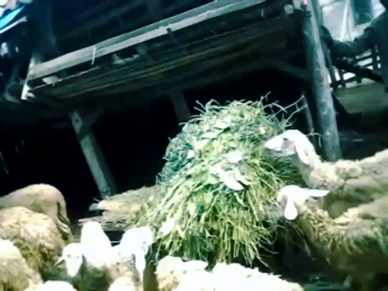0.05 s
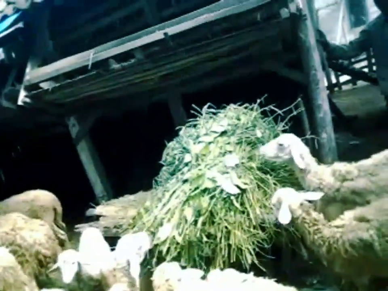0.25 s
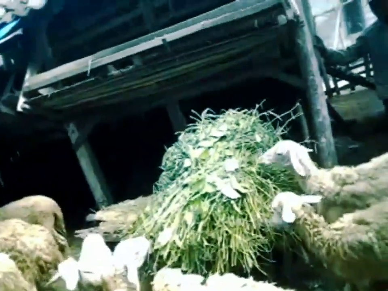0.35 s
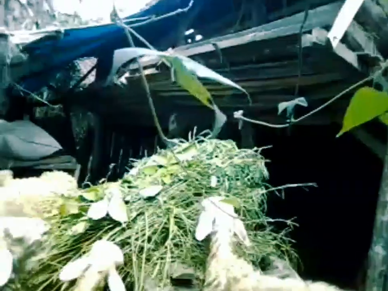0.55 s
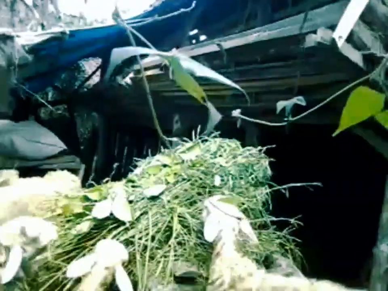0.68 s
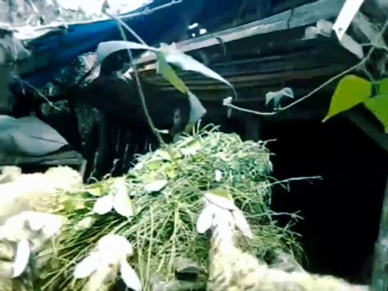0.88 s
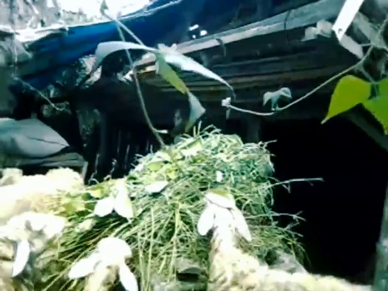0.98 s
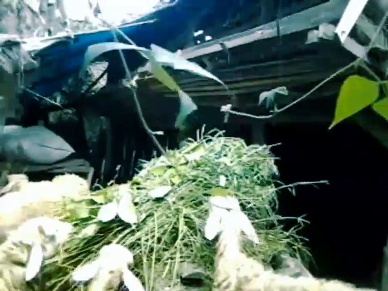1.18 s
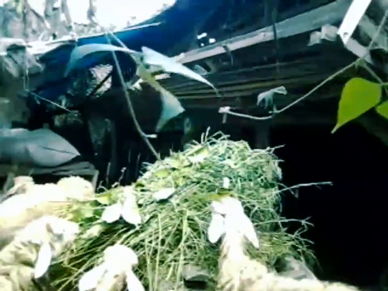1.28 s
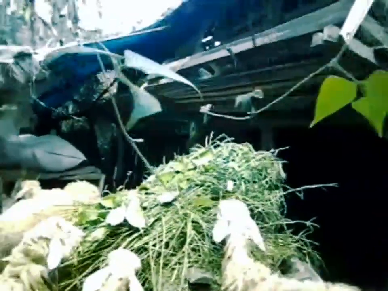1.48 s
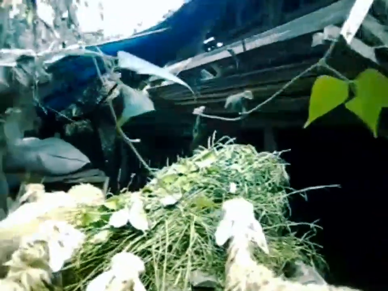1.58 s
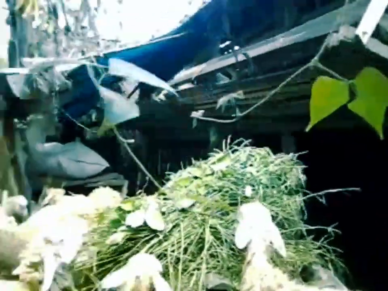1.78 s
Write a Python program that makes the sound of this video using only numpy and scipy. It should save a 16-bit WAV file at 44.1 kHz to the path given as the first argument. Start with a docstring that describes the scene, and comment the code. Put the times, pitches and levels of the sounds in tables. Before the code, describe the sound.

Two sheep bleat together in a wooden shed with a short echo. The softer, lower one starts right away and lasts until about 1.1 seconds. The loud one rides over it from 0.2 to 0.9 seconds, rising and falling in pitch. Fodder rustles faintly from around 1.4 seconds, and a stalk snaps with a tiny tick at 1.8. A low fluttering rumble and faint hiss continue throughout.

```python
"""A low fluttering rumble, faint hiss and rustling fodder open on a wooden shed, and at once two sheep bleat.
The softer, lower one starts earlier and ends later; the loud one rides over it in a single arch of pitch.
Each voice is a buzz of vocal folds with puffs of breath, shaped by the moving resonances of the throat.
Their pulses beat against each other, and the shed smears them and adds a short echo.
Afterwards the fodder crackles up again and one stalk snaps."""
import sys
import numpy as np
from scipy import signal
from scipy.fft import rfft, irfft
from scipy.io import wavfile
from scipy.ndimage import uniform_filter1d

SR = 44100
rng = np.random.default_rng(int(sys.argv[2]) if len(sys.argv) > 2 else 0)


def log_audio(samples):
    """Write samples as a 16-bit WAV file to the path given in sys.argv[1]."""
    # one column per channel
    frames = np.atleast_2d(samples).T
    # limit to full scale, then quantise
    limited = np.clip(frames, -1, 1)
    pcm = np.round(limited * 32767).astype(np.int16)
    wavfile.write(sys.argv[1], SR, pcm)


N = 81585

# fader of the rumble: t/s, level/dB
RUMBLE_FADER = [(.28, -55.5), (.36, -48.5), (1.0, -53.5), (1.12, -48), (1.18, -51.5)]
# tone of the rumble, the hiss and the rustle: f/Hz, relative level/dB
RUMBLE_EQ = [(25, -51), (48, -39), (70, -19), (108, -3), (150, -11), (330, -51)]
HISS_EQ = [(120, -11), (200, -2), (359, -9), (750, -10.5), (1130, -13), (6190, -21), (9770, -40.5),
           (15700, -28)]
RUSTLE_EQ = [(300, -58.5), (1000, -24), (2000, -1), (5600, 2.5), (7500, -3.5), (15500, -20)]
# fader of the rustling fodder: t/s, level/dB
RUSTLE_FADER = [(0, -65), (1.14, -69.5), (1.19, -71), (1.24, -82), (1.39, -62), (1.49, -66), (1.545, -55),
                (1.7, -68)]
# hoarse rasp of the folds: f/Hz, relative level/dB
RASP_EQ = [(250, -22), (1400, -4), (2450, 4), (3800, -1)]
# each bleat at the folds: t/s, pitch/Hz, level/dB, roughness/0-1
SOFT_CALL = [(.05, 147.9, -72, 0.77), (.08, 156.1, -54, 0.85), (.13, 169.4, -55.5, .85),
             (.17, 174.2, -62.5, .5), (.2, 183.3, -58, 0.31), (.23, 192.3, -42, 0.08),
             (.29, 194.5, -44.5, 0.32), (.345, 203.2, -46.5, 0.2), (.44, 202.3, -45, 0.2),
             (.53, 198, -48.5, 0.15), (.67, 196.4, -50, 0.12), (.76, 192.2, -45, 0.21),
             (.815, 182.5, -41.5, .25), (.88, 178.7, -40.5, .35), (.94, 177.3, -47, 0.22),
             (1.015, 173.6, -49, 0.28), (1.055, 168.8, -62, .5)]
LOUD_CALL = [(.195, 157, -71, 0.42), (.23, 166.9, -47, 0.38), (.27, 184, -43, 0.48), (.3, 197.3, -40, 0.46),
             (.335, 209.9, -38, 0.48), (.38, 220.1, -36.5, 0.3), (.42, 221.1, -39, 0.22),
             (.46, 218.7, -38, 0.24), (.505, 215.8, -36.5, 0.16), (.565, 214.6, -40.5, 0.08),
             (.6, 213.2, -35.5, 0.07), (.7, 210.8, -39, 0.09), (.76, 207, -41, 0.06),
             (.82, 201.9, -37, 0.17), (.85, 197, -44.5, 0.3), (.88, 192.1, -43.5, 0.4),
             (.9, 179.8, -43, 0.5), (.935, 162.8, -62, .5)]
# formants as the mouth moves: t/s, f1/Hz, f2/Hz, boost2/dB, f3/Hz, boost3/dB, treble shelf/dB
SOFT_FORMANTS = [(.17, 330, 1300, 13, 2600, -5, -3), (.225, 590, 1740, 8, 2320, 11, -3),
                 (.37, 700, 1825, 20, 2250, 6, -2), (.56, 540, 1780, 4, 2400, 2, 0),
                 (.76, 550, 1780, 3, 2500, 2, 0), (.81, 725, 1790, 3, 2600, 3, 0),
                 (.96, 710, 1800, -1, 2620, 7, -9), (.995, 900, 1800, -1, 2620, 19, -15)]
LOUD_FORMANTS = [(.23, 813, 2035, 22, 3010, 13.5, 10.5), (0.339, 858, 2140, 9.5, 2823, 18, -7),
                 (0.389, 900, 2003, 17, 2640, 9.5, -3.5), (0.462, 880, 2023, 18, 2570, 9.5, -1.5),
                 (0.518, 908, 2140, 4, 2765, 17, 0.5), (0.568, 1022, 2060, 11.5, 2637, 18.5, 1),
                 (0.611, 909, 2060, 3.5, 2592, 20.5, -4.5), (0.67, 882, 2053, 13, 2576, 12.5, 0.5),
                 (.74, 872, 1976, 20.5, 2780, 18.5, 0), (0.82, 925, 1876, 16.5, 2670, 7, -11),
                 (0.886, 730, 1800, 3, 3260, 5, 2.5)]
# half-widths of the formants: width1/Hz, width2/Hz, width3/Hz
SOFT_FORMANT_WIDTHS = [70, 80, 75]
LOUD_FORMANT_WIDTHS = [100, 120, 100]
# broad colour of each voice: f/Hz, gain/dB
SOFT_EQ = [(100, -28.5), (190, -8.5), (370, -3), (560, 0.5), (800, -1), (1150, -11), (1500, 1),
           (2200, -2.5), (3050, -6), (3700, -11), (5000, -26.5), (6500, -24.5), (9500, -51)]
LOUD_EQ = [(100, -39), (210, -11.5), (430, -9), (640, 0.5), (1000, -3.5), (1320, -0.5), (1650, -7.5),
           (1900, -0.5), (3350, -4), (3650, -16), (4100, -12.5), (5200, -26), (6500, -19.5), (8000, -32),
           (8800, -39.5), (14500, -42.5)]
# unevenness that reflections give the overtones: f/Hz, rms depth/dB
RIPPLE_DEPTH = [(900, 1.3), (3600, 4)]
# decay of the shed's echo: f/Hz, t60/s
ECHO_DECAY = [(800, .52), (2600, .18), (5000, .07)]
# echo against the direct sound: f/Hz, level/dB
ECHO_SEND = [(800, -15), (2600, -11), (4500, -3)]
# cue for the snapping stalk: t/s, level/dB
SNAP_CUES = [(1.8274, -39)]
# ring of the stalk: f/Hz, relative level/dB
STALK_MODES = [(4100, -1.5), (5600, -8)]

HISS_DB, CRACKLES_PER_S, SNAP_T60_S = -56.5, 7800, 0.0092
JITTER, JITTER_HZ = 0.0314, 83.3  # relative pitch wobble at full roughness, and its speed
PUFF_CYCLES, PUFF_STEADY = 0.053, 0.31  # decay of a puff, and the steady breath under it
FADE_DB_PER_S = 503  # a voice swells in and dies away at this rate
TREBLE_HZ, CLOSED_HZ, CLOSED_DB, OPENING_S = 3850, 1200, -9, .1
SCATTER_S, SCATTER_GRAIN_HZ, RIPPLE_S, PREDELAY_S = .007, 220, .09, .003


def amp(db):
    """Decibels to gain."""
    return 10 ** (np.asarray(db) / 20)


def unit_rms(x):
    """Scales to rms 1."""
    return x / np.sqrt(np.mean(x ** 2) + 1e-20)


def at_hz(points, hz):
    """Reads a spectrum on a log-frequency axis."""
    f, value = np.transpose(points)
    return np.interp(np.log(hz + 1), np.log(f + 1), value)


def curves(table, t):
    """Reads every column of a time table at the times t."""
    times, *columns = np.transpose(table)
    return [np.interp(t, times, column) for column in columns]


def coloured(x, eq):
    """Runs x through an EQ curve and sets it to rms 1."""
    return unit_rms(irfft(rfft(x) * amp(at_hz(eq, np.fft.rfftfreq(N, 1 / SR))), N))


def wander(hz):
    """A random wobble, up to about hz."""
    f = np.fft.rfftfreq(N, 1 / SR)
    return unit_rms(irfft(rfft(rng.standard_normal(N)) / (1 + (f / hz) ** 4), N))


def shelf(hz, corner_hz):
    """High-shelf shape: 0 below the corner, 1 above."""
    return 1 - 1 / (1 + (hz / corner_hz) ** 8)


def room_tone():
    """The bed: a low fluttering rumble and faint hiss."""
    level_db, = curves(RUMBLE_FADER, np.arange(N) / SR)
    rumble = amp(level_db) * coloured(rng.standard_normal(N), RUMBLE_EQ)
    return rumble + amp(HISS_DB) * coloured(rng.standard_normal(N), HISS_EQ)


def fodder():
    """Grass being pulled: dense tiny crackles that blur into a rustle."""
    level_db, = curves(RUSTLE_FADER, np.arange(N) / SR)
    crackles = rng.standard_normal(N) * (rng.random(N) < CRACKLES_PER_S / SR)
    return amp(level_db) * coloured(crackles, RUSTLE_EQ)


def folds(hz, rough):
    """Vocal folds: slightly uneven pulses, each with a puff of noise. Roughness trades buzz for rasp."""
    cycles = np.cumsum(hz * (1 + JITTER * rough * wander(JITTER_HZ))) / SR
    buzz = sum(np.cos(2 * np.pi * k * cycles) for k in np.arange(1, 90))
    puffs = PUFF_STEADY + np.exp(-(cycles % 1) / PUFF_CYCLES)
    rasp = coloured(puffs * rng.standard_normal(N), RASP_EQ) * np.sqrt(SR / hz) / 2
    return np.sqrt(1 - rough ** 2) * buzz + rough * rasp


def throat(x, formants, widths, boost1_db, eq, size=512):
    """Three moving resonances on top of the voice's broad colour, dull until the mouth opens."""
    hop, fft_size = size // 8, size * 4
    starts = np.arange(0, N, hop)
    t, hz = starts[:, None] / SR, np.fft.rfftfreq(fft_size, 1 / SR)
    f1, f2, boost2_db, f3, boost3_db, treble_db = curves(formants, t)
    peaks = zip((f1, f2, f3), (boost1_db, boost2_db, boost3_db), widths)
    db = at_hz(eq, hz) + sum(boost / (1 + ((hz - f) / width) ** 2) for f, boost, width in peaks)
    closed = np.clip(1 - (t - formants[0][0]) / OPENING_S, 0, 1)
    db += treble_db * shelf(hz, TREBLE_HZ) + CLOSED_DB * closed * shelf(hz, CLOSED_HZ)
    # minimum phase: the throat rings after each pulse
    log_gain = np.log(amp(np.hstack([db, db[:, -2:0:-1]])))
    response = np.exp(np.conj(signal.hilbert(log_gain, axis=1)))[:, :len(hz)]
    window = np.hanning(size) * 2 * hop / size
    grains = np.pad(x, size)[starts[:, None] + np.arange(size) + size // 2] * window
    out = np.zeros(N + fft_size)
    for start, grain in zip(starts, irfft(rfft(grains, fft_size) * response)):
        out[start:start + fft_size] += grain
    return out[size // 2:][:N]


def bleat(call, formants, widths, eq, boost1_db):
    """One sheep: vocal folds sounding through the throat."""
    t = np.arange(N) / SR
    hz, level_db, rough = curves(call, t)
    outside_s = abs(t - np.clip(t, call[0][0], call[-1][0]))
    source = folds(hz, rough) * amp(level_db - FADE_DB_PER_S * outside_s)
    return throat(source, formants, widths, boost1_db, eq)


def scattered(x, size=512):
    """Boards smear each pulse: every band has its own delay and a slowly drifting level."""
    hz = np.fft.rfftfreq(N, 1 / SR)
    knots_hz = np.arange(0, SR / 2, SCATTER_GRAIN_HZ)
    delay_s = np.interp(hz, knots_hz, SCATTER_S * rng.random(len(knots_hz)))
    smeared = irfft(rfft(x) * np.exp(-2j * np.pi * np.cumsum(delay_s) * hz[1]), N)
    band_hz, t, bands = signal.stft(smeared, SR, nperseg=size)
    drift = uniform_filter1d(rng.standard_normal(bands.shape), round(RIPPLE_S / t[1]), axis=1)
    drift = unit_rms(uniform_filter1d(drift, round(SCATTER_GRAIN_HZ / band_hz[1]), axis=0))
    ripple_db = at_hz(RIPPLE_DEPTH, band_hz)[:, None] * drift
    return signal.istft(bands * amp(ripple_db), SR, nperseg=size)[1][:N]


def shed_echo(x, size=256):
    """A short, dense echo from boards and roof; the highs die first."""
    hz, t, noise = signal.stft(rng.standard_normal(SR // 2), SR, nperseg=size)
    t60 = at_hz(ECHO_DECAY, hz)[:, None]
    unit_energy = np.sqrt(np.log(1e6) / (t60 * SR))
    envelope = amp(at_hz(ECHO_SEND, hz)[:, None] - 60 * t / t60) * unit_energy
    tail = signal.istft(noise * envelope, SR, nperseg=size)[1]
    return signal.fftconvolve(x, np.pad(tail, (round(PREDELAY_S * SR), 0)))[:N]


def snap(start_s, level_db):
    """A stalk breaks with a tiny, bright tick."""
    age = np.maximum(np.arange(N) / SR - start_s, 0)
    ring = sum(amp(db) * np.sin(2 * np.pi * hz * age) for hz, db in STALK_MODES)
    return ring * amp(level_db - 60 * age / SNAP_T60_S)


def scene():
    """The mono mix: both sheep and their echo over room tone and fodder."""
    loud = bleat(LOUD_CALL, LOUD_FORMANTS, LOUD_FORMANT_WIDTHS, LOUD_EQ, boost1_db=18.5)
    soft = bleat(SOFT_CALL, SOFT_FORMANTS, SOFT_FORMANT_WIDTHS, SOFT_EQ, boost1_db=11)
    sheep = scattered(loud) + scattered(soft)
    stalk = sum(snap(*cue) for cue in SNAP_CUES)
    return (sheep + shed_echo(sheep) + room_tone() + fodder() + stalk)[None]


def record(dry):
    """A steep high cut on the whole mix."""
    high_cut = signal.firwin(801, cutoff=15760, window=("kaiser", 9), fs=SR)
    return signal.oaconvolve(dry, high_cut[None], "same")


dry = scene()
out = record(dry)
log_audio(out)
```